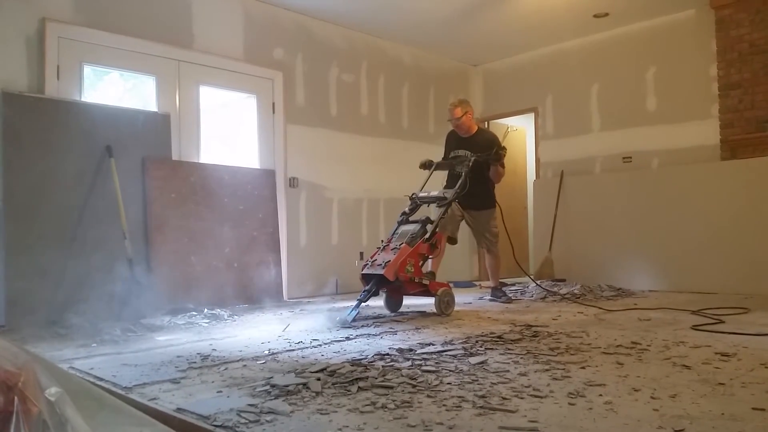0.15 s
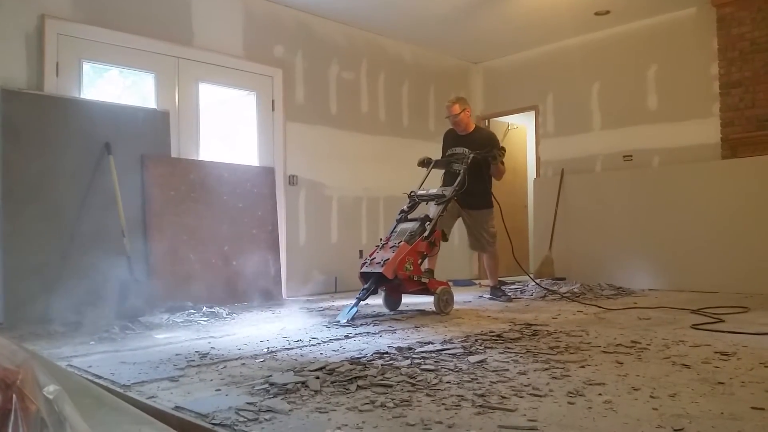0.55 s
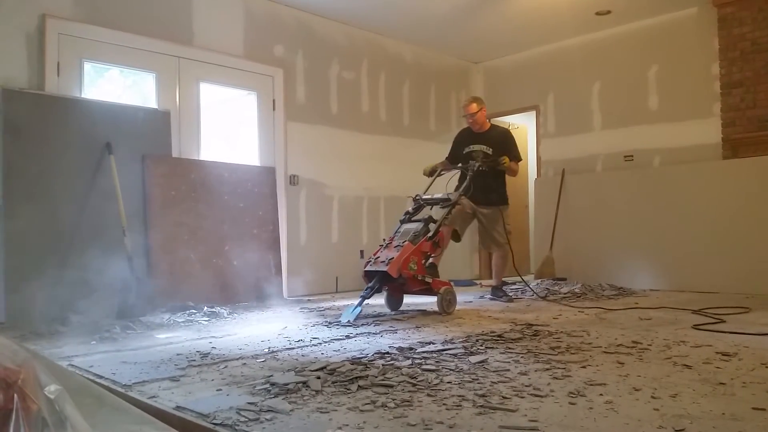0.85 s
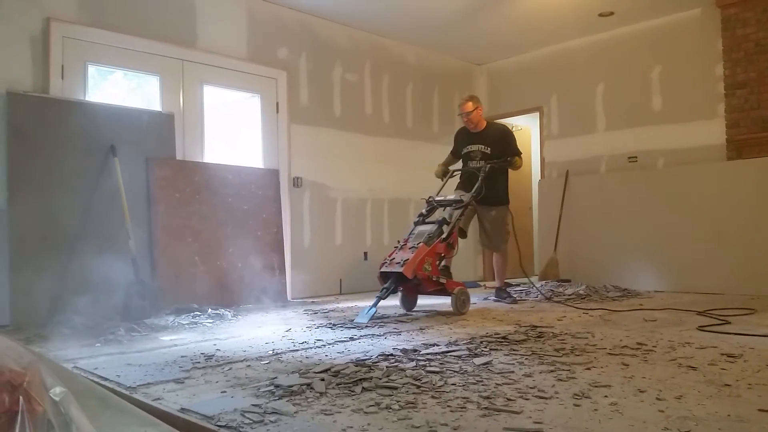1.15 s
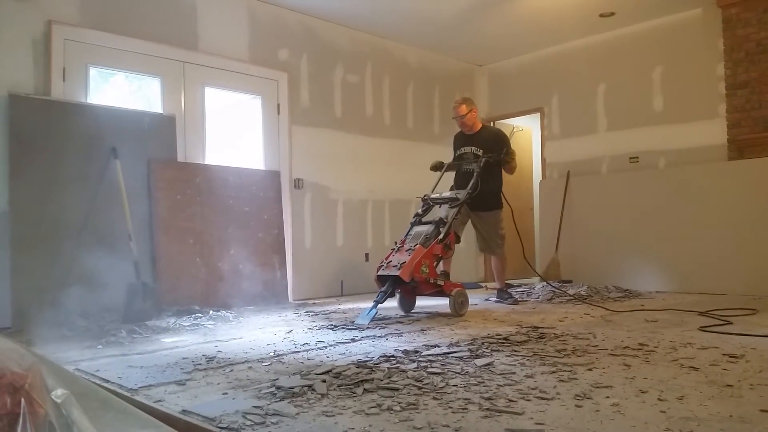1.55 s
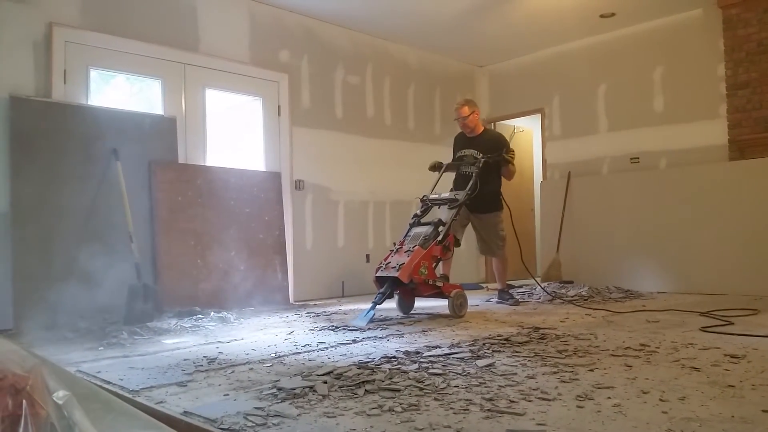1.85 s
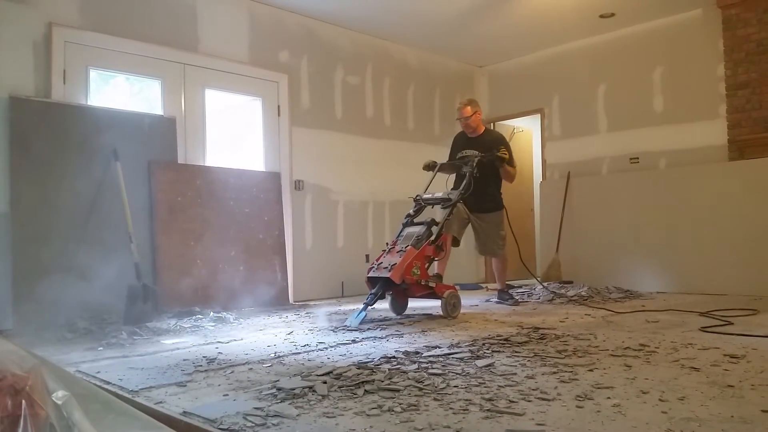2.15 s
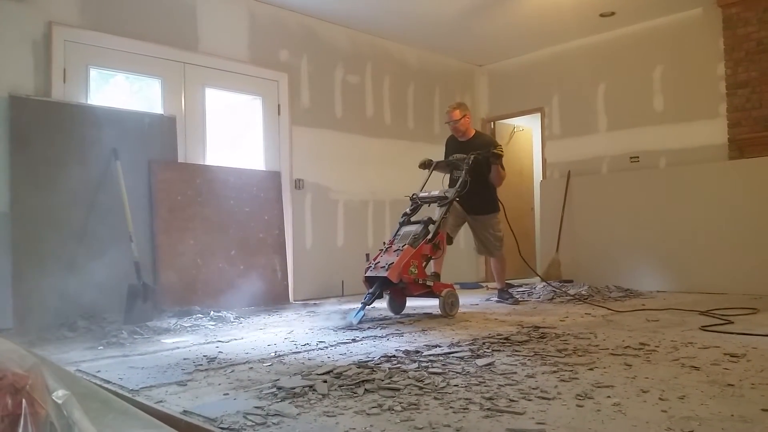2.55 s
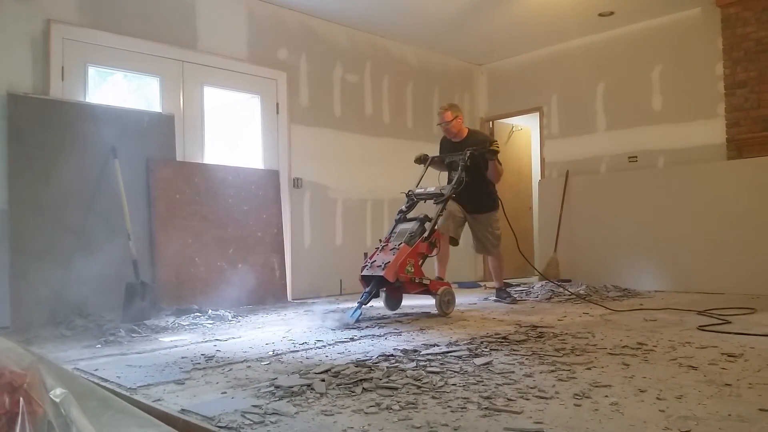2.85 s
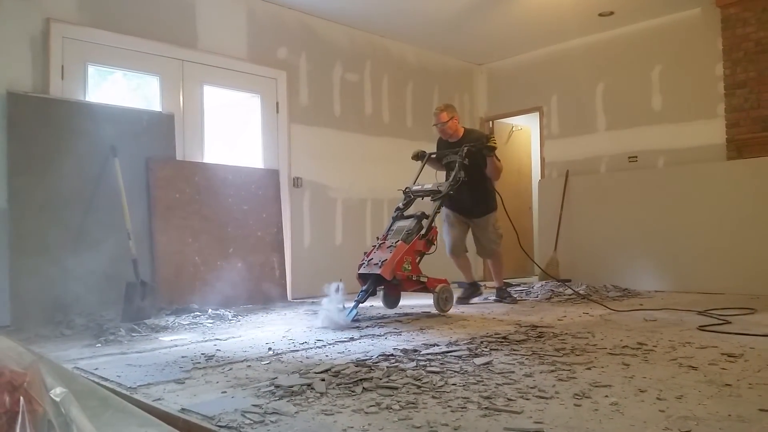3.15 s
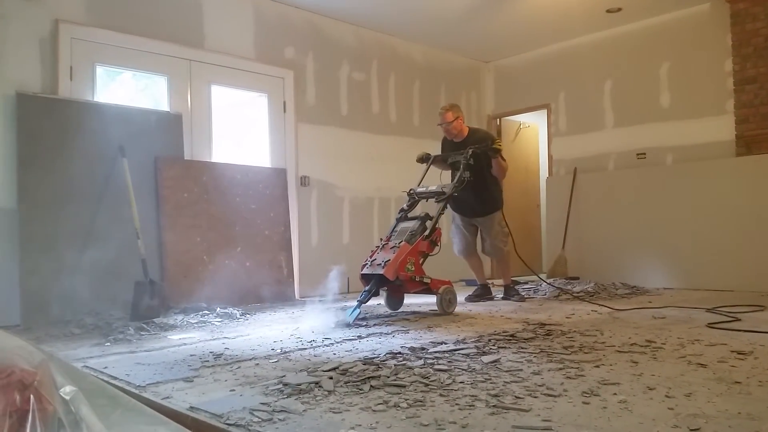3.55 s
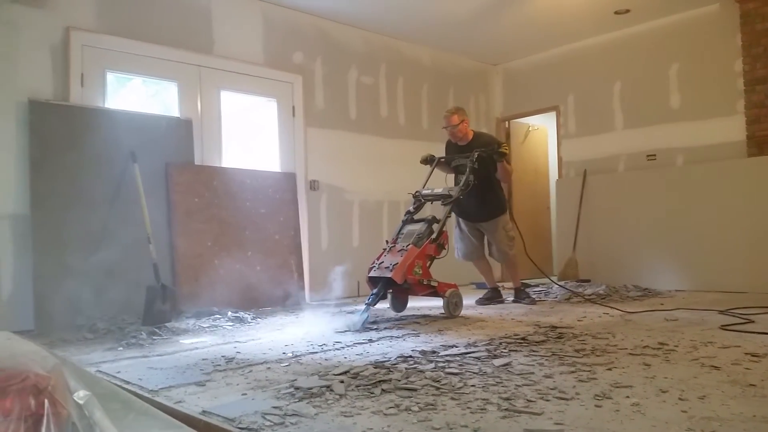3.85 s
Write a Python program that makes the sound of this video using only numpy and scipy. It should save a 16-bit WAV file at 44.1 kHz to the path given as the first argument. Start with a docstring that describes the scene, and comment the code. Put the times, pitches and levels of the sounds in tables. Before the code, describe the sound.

Rapid metallic hammering cracks tile and thumps a concrete slab; a brief motor-only pause, a weak rattling restart, a dull knock close to the stereo microphone, then continuous loud pounding with hard room reverberation.

```python
"""Bursts of about twenty hard steel blows a second, with gaps where a gear whine rises over motor roar.
Place: a bare room with a concrete floor; an electric demolition hammer on a wheeled frame chisels off tile.
Each blow ticks the shank, rings resonant chisel modes, cracks tile (filtered noise) and thumps the slab.
Freed chisel modes sing as paired tones; frame parts buzz in narrow bands; dull knocks land near the microphone.
Hard walls add decaying noise tails; a two-port microphone hears direct sound and room together."""
import sys
import numpy as np
from scipy import signal
from scipy.fft import rfft, irfft
from scipy.io import wavfile
from scipy.ndimage import uniform_filter1d

SR = 44100
rng = np.random.default_rng(int(sys.argv[2]) if len(sys.argv) > 2 else 0)


def amp(db):
    return 10 ** (np.asarray(db, float) / 20)


def write(x):
    x = np.atleast_2d(x).T
    wavfile.write(sys.argv[1], SR, np.round(np.clip(x, -1, 1) * 32767).astype(np.int16))


N = 176400  # samples: 4 s

# Room decay [f/Hz, t60/s]
ROOM_DECAY = [(100, 0.56), (500, 0.85), (2000, 1), (6000, 0.77), (12000, 0.43), (16000, 0.18)]
# Left-right likeness of the room tail [f/Hz, correlation]
PORT_LIKENESS = [(60, 0.34), (130, 0.88), (290, 0.78), (640, 0.43), (1410, -0.14), (3100, 0.029),
                 (6820, 0.025), (15000, 0.071)]
# Phase by which the direct sound leads at the left port [f/Hz, phase/rad]
DIRECT_LEAD = [(0, -3.5), (600, 0.7), (950, -0.5), (2500, -6), (4480, -4.5), (5340, -4.5), (5680, -2),
               (6370, 0.8), (7490, 1.5), (9990, 1.5), (10400, 2), (12200, 1.3), (13400, 3), (15300, 10.5)]
# Left minus right level of the microphone pair [f/Hz, level/dB]
PORT_LEAN = [(60, -3), (92, 4), (140, -3.5), (210, 0), (330, -0.5), (500, 2), (770, -0.5), (1170, 0.0),
             (1790, -0.5), (2740, 1.0), (4190, 5.5), (6410, 6.5), (9810, -3.5), (15000, -3.5)]
# Fan and brush roar, relative spectrum [f/Hz, level/dB per Hz]
MOTOR_SPECTRUM = [(15, -60), (25, -33), (60, -23.5), (180, -24.5), (260, -14), (430, -13.5), (570, -5.5),
                  (800, -6.5), (1050, -9), (1300, -7.5), (1650, -5), (1900, -7.5), (2300, -3.5),
                  (2800, -10.5), (4100, -14), (6400, -12), (8000, -20), (8800, -12.5), (9400, -7),
                  (11900, -5.5), (13300, -13.5), (15600, -27), (16500, -40)]
# Gear whine glide [t/s, f/Hz, level/dB]
WHINE_GLIDE = [(0, 3100, -64), (.36, 3260, -56), (.46, 3370, -50), (.56, 3540, -49), (.7, 3720, -54),
               (.88, 3875, -53), (.96, 3800, -53), (1.08, 3540, -51), (1.2, 3350, -53), (1.37, 3140, -55),
               (1.6, 3000, -64)]
# Frame parts that buzz for a while [start t/s, length/s, f/Hz, width/Hz, level/dB]
FRAME_BUZZES = [(1.42, 0.36, 755, 60, -37), (1.27, .14, 780, 60, -45), (2.72, 0.4, 464, 10, -41),
                (1.05, 0.5, 260, 44, -53), (1.5, .15, 610, 27, -47)]
# Dull knocks near the microphone [t/s, level/dB, centre f/Hz, spread/s]
NEAR_KNOCKS = [(2.022, -12.5, 310, 0.016), (2.019, -21, 760, .01), (2.024, -22, 140, .016),
               (2.042, -25, 450, .008), (1.01, -51, 61, .012), (3.035, -39, 66, .012)]
# Working spells of the piston, one list each; load slows the rate [t/s, blows counted so far]
PISTON_SPELLS = [
    [(-.019, 0), (.031, 1), (.330, 7), (.43, 9)],
    [(1.356, 0), (1.673, 7), (1.845, 11), (1.961, 14), (2.003, 15), (2.125, 18)],
    [(2.218, 0), (2.340, 3), (2.430, 5), (2.527, 7), (2.870, 14), (3.318, 23), (3.965, 36)],
]
# Blow strength, stretch by stretch [t/s, steel level/dB, tile level/dB, slab level/dB]
BLOW_STRENGTH = [
    [(0.0, -26, -31, -39.5), (0.052, -24, -28.5, -40), (0.236, -23, -28.5, -39.5), (0.368, -35, -45, -52),
     (0.424, -51, -59, -53), (0.43, -61, -60, -66)],
    [(1.356, -41.5, -30, -61), (1.43, -41, -33.5, -66), (1.478, -38.5, -31, -53),
     (1.574, -29, -25.5, -44.5), (1.6, -36, -28.5, -34), (1.64, -30, -26, -45)],
    [(1.673, -24, -26.5, -39.5), (1.739, -27.5, -28, -41.5), (1.923, -24, -32, -40.5),
     (1.979, -21.5, -22.5, -41), (2.019, -24.5, -38, -39), (2.125, -33, -49, -66)],
    [(2.22, -24.5, -27.5, -41.5), (2.238, -22, -28, -38.5), (2.314, -22, -26.5, -35.5),
     (3.068, -22, -24.5, -35.5), (3.086, -20, -19, -40), (3.1, -18, -18, -39)],
    [(3.12, -23.5, -33, -39), (3.148, -24, -26, -40), (3.396, -23.5, -30.5, -38.5),
     (3.538, -23, -25, -35.5), (3.794, -22.5, -25, -36.5), (4.0, -22.5, -30, -41)],
]
# Slab thump, relative spectrum [f/Hz, level/dB per Hz]
SLAB_SPECTRUM = [(15, -58), (25, -39), (70, -15.5), (108, -3), (210, 2), (348, -2), (430, -12), (460, 0.5),
                 (600, -10), (780, -15), (1320, -120)]
# Resonances added to the slab's push [f/Hz, width/Hz, level/dB]
SLAB_MODES = [(120, 4.9, 3), (221, 12, -3.5)]
# Tile crack, relative spectrum [f/Hz, level/dB per Hz]
TILE_SPECTRUM = [(180, -71), (300, -21), (429, -1), (463, -24), (575, -2.5), (1770, 6), (2250, 2.5),
                 (3440, -1.5), (4000, -18), (5200, -32), (8800, -120)]
# Resonances of the tile, relative to its crack [f/Hz, width/Hz, level/dB]
TILE_MODES = [(1464, 140, -13), (2200, 400, -7.5)]
# Free chisel singing [start t/s, length/s, f/Hz, level/dB, t/s when both ports are in step]
SINGING_MODES = [(0.029, .11, 11385, -12.5, 0.075), (1.965, .04, 10300, -15, 1.98),
                 (2.003, 0.16, 10300, -10.5, 2.01), (2.497, 0.11, 10250, -22, 2.55),
                 (2.65, .12, 10260, -19, 2.7), (3.02, 0.13, 10290, -19, 3.06)]
# Broad clang of the steel, relative spectrum [f/Hz, level/dB per Hz]
CLANG_SPECTRUM = [(1470, -55), (2500, -10.5), (3420, -9.5), (4150, -5.5), (6030, -7), (6560, -10.5),
                  (7140, -1.5), (7650, -12.5), (8780, -9), (10200, -1), (11800, 0.5), (13300, -3.5),
                  (14400, -3.5), (15600, -7.5)]
# Chisel mode frequencies [f/Hz]
CHISEL_MODES_HZ = [4150, 4775, 5548, 6040, 7110, 8030, 9340, 9830, 10300, 10520, 11395, 11890, 12700, 14480]
# Chisel modes in the same order, relative levels [width/Hz, level/dB]
CHISEL_MODES = [(220, -9), (90, -13), (110, -8.5), (92, -9.5), (240, -15), (160, -9), (120, -5), (66, -3.5),
                (130, -0.5), (120, -4), (70, -5.5), (160, -2.5), (80, -8), (170, -9)]

STEEL_DECAY_S = 0.0067


def evened(x):
    """Scales to rms 1."""
    return x / np.sqrt(np.mean(x ** 2) + 1e-20)


def read(points, hz):
    """Looks a spectrum up on a log-frequency axis."""
    f, value = np.transpose(points)
    return np.interp(np.log(hz + 1), np.log(f + 1), value)


def column(table, index, t):
    """Reads one column of a curve at times t."""
    rows = np.array(table, float)
    return np.interp(t, rows[:, 0], rows[:, index])


def colour(x, points):
    """Filters by a dB spectrum."""
    gain = amp(read(points, np.fft.rfftfreq(len(x), 1 / SR)))
    return irfft(rfft(x) * gain, len(x))


def resonate(x, hz, width):
    """Shifts hz to zero, smooths, shifts back: a resonance with the given width in Hz."""
    turn = np.exp(2j * np.pi * np.cumsum(hz * np.ones(len(x))) / SR)
    r = np.exp(-np.pi * width / SR)
    return 2 * (turn * signal.lfilter([1 - r], [1, -r], x / turn)).real


def noise():
    """White noise."""
    return rng.standard_normal(N)


def smooth_noise(size):
    """Slow random wander of rms 1, averaged twice over size samples."""
    return evened(uniform_filter1d(uniform_filter1d(noise(), size), size))


def tail():
    """A dense stereo tail dying by band; the ports' likeness varies with frequency."""
    hz, t, z = signal.stft(rng.choice([-1., 1.], (2, SR // 2 + SR // 4)), SR, nperseg=512)
    same = np.clip(read(PORT_LIKENESS, hz), -1, 1)[:, None]
    z = np.array([z[0], same * z[0] + np.sqrt(1 - same ** 2) * z[1]])
    z = z * amp(-60 * t / read(ROOM_DECAY, hz)[:, None])
    z = z / np.sqrt((abs(z) ** 2).sum(-1, keepdims=True))  # equal energy in every band
    taps = signal.istft(z, SR, nperseg=512)[1]
    return taps / np.sqrt((taps ** 2).sum() / 2)


def room(x):
    """Direct sound plus wall tails; the machine shifts, so overlapping stretches get their own echoes."""
    shift_s, gap_s, direct_db = .2, .004, -7.5  # gap: delay of the tail
    hop, gap = int(shift_s * SR), int(gap_s * SR)
    padded = np.r_[x[2 * hop:0:-1], x, np.zeros(2 * hop)]  # mirrored sound ahead fills the room at the start
    window = np.sin(np.pi * np.arange(2 * hop) / (2 * hop))
    wet = np.zeros((2, len(padded) + 2 * SR))
    for at in range(0, N + 2 * hop, hop):
        piece = signal.fftconvolve((padded[at:at + 2 * hop] * window)[None], tail(), axes=1)
        wet[:, at + gap:at + gap + piece.shape[1]] += piece
    lead = np.exp(1j * read(DIRECT_LEAD, np.fft.rfftfreq(N, 1 / SR)))
    direct = np.array([irfft(rfft(x) * lead, N), x])
    return (wet[:, 2 * hop:2 * hop + N] + amp(direct_db) * direct) / np.sqrt(1 + amp(2 * direct_db))


def motor():
    """Fan and brush roar: coloured noise with a slight flutter in level."""
    level_db, flutter_db = -31, 0.42
    return amp(level_db + flutter_db * smooth_noise(700)) * evened(colour(noise(), MOTOR_SPECTRUM))


def whine():
    """Gear whine: a tone that rises when the load is off, wavering in pitch and level."""
    waver_hz, flicker_db = 25., 3.
    t = np.arange(N) / SR
    drift, flicker = (evened(uniform_filter1d(noise(), 900)) for _ in "ab")
    hz = column(WHINE_GLIDE, index=1, t=t) + waver_hz * drift
    tone = np.sqrt(2) * np.sin(2 * np.pi * np.cumsum(hz) / SR)
    return amp(column(WHINE_GLIDE, index=2, t=t) + flicker_db * flicker) * tone


def buzzes():
    """Loose parts of the frame hum: narrow-band noise, swelling and stopping."""
    t, out = np.arange(N) / SR, np.zeros(N)
    for start, length, hz, width, db in FRAME_BUZZES:
        progress = np.clip((t - start) / length, 0, 1)
        swell = np.sin(np.pi * progress ** 1.4) ** .6
        band = resonate(resonate(noise(), hz, width), hz, 3 * width)
        out += amp(db) * swell * evened(band)
    return out


def knocks():
    """A short low push in a flurry of rumble, without the room; the flurry differs per port."""
    t, out = np.arange(N) / SR, np.zeros((2, N))
    for s, db, hz, spread in NEAR_KNOCKS:
        push = np.exp(-(2.2 * hz * (t - s)) ** 2) * np.cos(2 * np.pi * hz * (t - s))
        a, b = (evened(resonate(resonate(noise(), hz, 0.6 * hz), hz, 5.9 * hz)) for _ in "ab")
        flurry = np.array([a + 0.67 * b, a - 1.0 * b]) * np.exp(-np.abs(t - s) / spread)
        out += amp(db) * (push + 0.32 * flurry)
    return out


def blow_times():
    """Seconds at which the piston strikes, from the blow count of each spell."""
    times = []
    for spell in PISTON_SPELLS:
        seconds, count = np.transpose(spell)
        times.append(np.interp(np.arange(spell[-1][1] + 1), count, seconds))
    return np.concatenate(times)


def strength(times, index):
    """Level in dB of every blow: one material's curve plus scatter."""
    scatter_db = 0.58
    return column(np.concatenate(BLOW_STRENGTH), index, times) + scatter_db * rng.standard_normal(len(times))


def impulses(times, height):
    """One impulse per blow."""
    train = np.zeros(N)
    train[np.maximum((times * SR).astype(int), 0)] = height
    return train


def stroke(times, decay_s, db):
    """Blow envelope: a jump dying away, then loose chatter; at 20 blows/s mean power follows db."""
    rise_s, chatter_db, chatter_s = 0.0022, -21.5, .055
    t = np.arange(int(.12 * SR)) / SR
    chatter = amp(chatter_db) * (t < chatter_s)
    shape = (np.exp(-t / decay_s) + chatter) * (1 - np.exp(-t / rise_s))
    train = impulses(times, amp(2 * db))
    power = signal.oaconvolve(train, shape ** 2 / np.sum(shape ** 2) * SR / 20)[:N]
    return np.sqrt(np.abs(power))


def slab(times):
    """Floor thump: the same filtered push each blow, with ringing and room, plus noisy rumble."""
    push_share, decay_s, late_s, tail_db = .7, 0.031, 0.012, -1.5  # share of power
    db = strength(times, index=3)
    raw = noise()
    scale = np.std(colour(raw, SLAB_SPECTRUM))
    push = impulses(times, amp(db) * np.sqrt(SR / 20))
    push = colour(np.roll(push, int(late_s * SR)), SLAB_SPECTRUM) / scale  # the slab answers a little late
    push = push + sum(amp(g) * resonate(push, hz, width) for hz, width, g in SLAB_MODES)
    rumble = colour(raw * stroke(times, decay_s, db), SLAB_SPECTRUM) / scale
    # low room modes stay put: one tail serves every push
    push = push + amp(tail_db) * signal.fftconvolve(push[None], tail(), axes=1)[:, :N]
    return np.sqrt(push_share) * push, np.sqrt(1 - push_share) * rumble


def tile(times):
    """Tile cracks under each blow and chips clatter: noise and random grains through tile resonances."""
    chips_per_s, chips_db, chip_spread_db, decay_s = 360, -13, 3.6, 0.007
    db = strength(times, index=2)
    chip_level = amp(chip_spread_db * np.minimum(rng.exponential(1, N), 4))
    chips = (rng.random(N) < chips_per_s / SR) * chip_level * noise()
    drive = noise() + amp(chips_db) * evened(chips)
    rings = sum(amp(g) * evened(resonate(drive, hz, width)) for hz, width, g in TILE_MODES)
    crack = evened(colour(drive, TILE_SPECTRUM))
    return evened(crack + rings) * stroke(times, decay_s, db)


def singing(times):
    """A free chisel mode, a close pair with one tone per port, swells, throbs with blows and rings out."""
    rise_s, fade_s, waver_hz, split_hz = .006, .04, 10., 8.5
    throb_db, throb_s = 3., 1 / 24  # every blow re-kicks the ring, which then sinks by this much
    t, out = np.arange(N) / SR, np.zeros((2, N))
    since = t - times[np.maximum(np.searchsorted(times, t) - 1, 0)]  # time since the last blow
    throb = amp(-throb_db * uniform_filter1d(np.clip(since / throb_s, 0, 1), 150))
    drift = waver_hz * smooth_noise(600)
    for start, length, hz, db, step in SINGING_MODES:
        swell = np.clip((t - start) / rise_s, 0, 1)
        swell = swell * np.exp(-np.maximum(t - start - length, 0) / fade_s)
        split = np.outer([.5, -.5], split_hz * (t - step))
        phase = 2 * np.pi * (np.cumsum(hz + drift) / SR + split)
        out += np.sqrt(2) * amp(db) * swell * throb * np.sin(phase)
    return out


def ticks(times):
    """The piston's sharp tick on the shank: one dry resonance per blow, stronger at the left port."""
    hz, width_hz, level_db, scatter_db = 4350, 450, 9, 4  # level over the steel curve
    db = strength(times, index=1) + level_db + scatter_db * rng.standard_normal(len(times))
    kick = impulses(times, amp(db) * SR / (2 * np.pi * width_hz))
    return np.outer([1, .5], resonate(kick, hz, width_hz))


def chisel(times):
    """Each blow rings the steel's modes, unevenly, over a broad clang."""
    clang_db, modes_db, scatter_db = 5, -2, 2.5
    db = strength(times, index=1)
    out = amp(clang_db) * evened(colour(noise(), CLANG_SPECTRUM)) * stroke(times, STEEL_DECAY_S, db)
    uneven = scatter_db * rng.standard_normal((len(times), len(CHISEL_MODES)))
    for k, (hz, (width, mode_db)) in enumerate(zip(CHISEL_MODES_HZ, CHISEL_MODES)):
        drive = noise() * stroke(times, STEEL_DECAY_S, db + uneven[:, k])
        ring = resonate(drive, hz, width) * np.sqrt(SR / (np.pi * width))  # narrow modes keep their power
        out += amp(mode_db + modes_db) * ring
    return out


def scene():
    """The machine in the room, with its direct sounds and the near knocks."""
    room_db, song_wet_db, whine_wet_db, buzz_direct_db = 3.0, -14, -3, -3
    times = blow_times()
    hum, gears, song = buzzes(), whine(), singing(times)
    push, rumble = slab(times)
    machine = motor() + amp(whine_wet_db) * gears + hum + rumble + tile(times)
    machine += amp(song_wet_db) * song[0] + chisel(times)
    direct = gears + amp(buzz_direct_db) * hum  # beams straight at the microphone
    return amp(room_db) * room(machine) + direct + knocks() + push + song + ticks(times)


def band_limit(x):
    """A steep low-pass at the top of the band."""
    return signal.sosfilt(signal.butter(12, 15750, fs=SR, output="sos"), x)


def record(dry):
    """Microphone pair: the ports lean apart by frequency, the top is cut off and peaks clip."""
    edge_hz = 15760
    hz = np.fft.rfftfreq(N, 1 / SR)
    lean = amp(np.outer([.5, -.5], read(PORT_LEAN, hz))) * (hz < edge_hz)
    mix = np.clip(irfft(rfft(dry) * lean, N), -1, 1)
    return band_limit(mix)


dry = scene()
out = record(dry)
write(out)
```